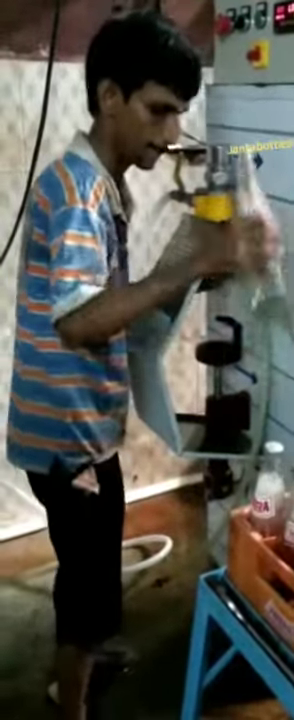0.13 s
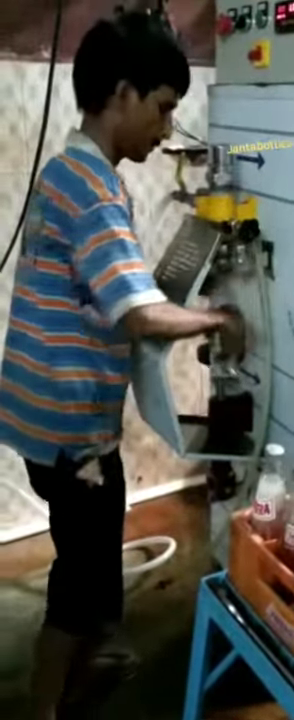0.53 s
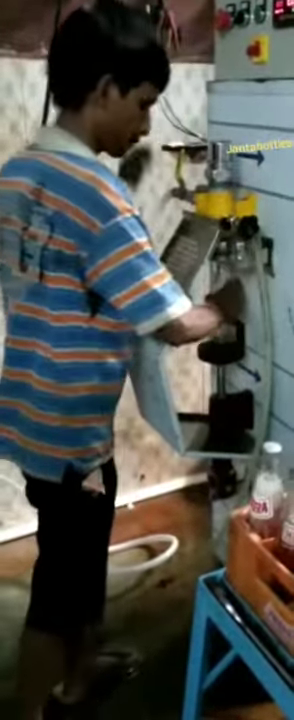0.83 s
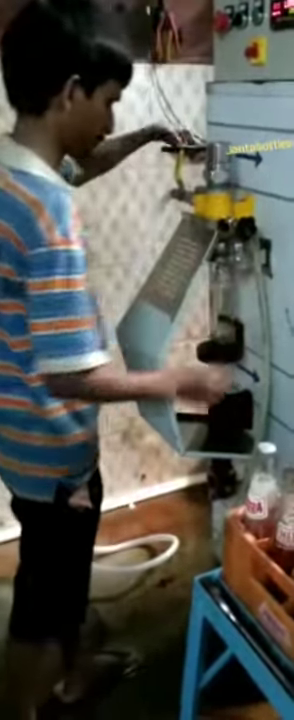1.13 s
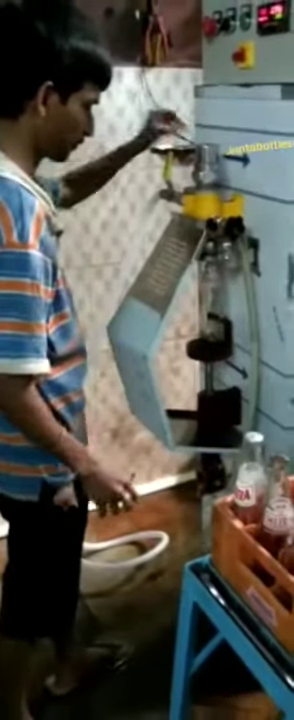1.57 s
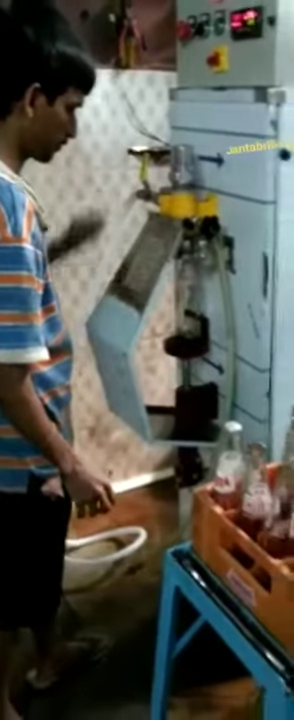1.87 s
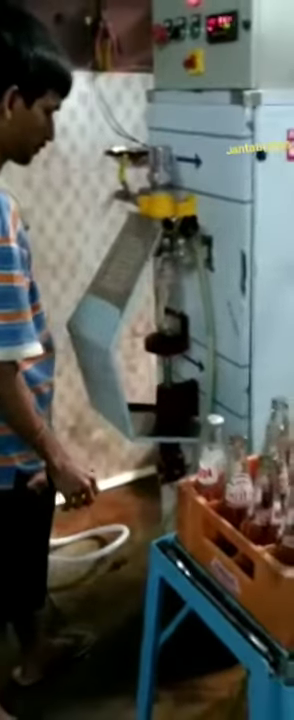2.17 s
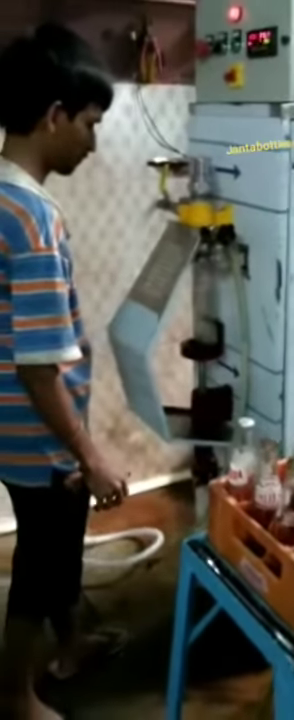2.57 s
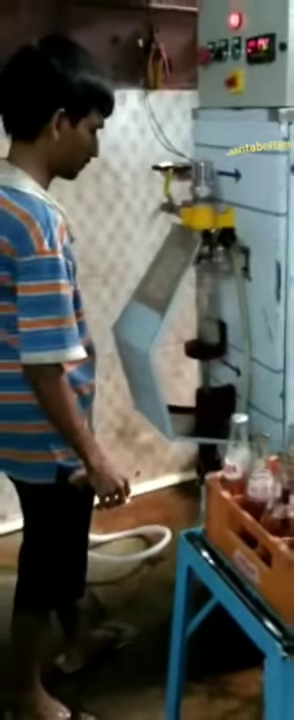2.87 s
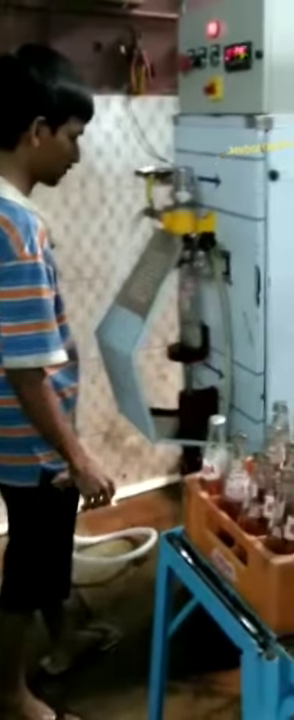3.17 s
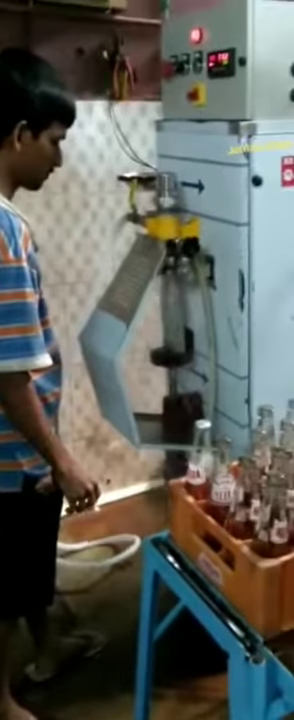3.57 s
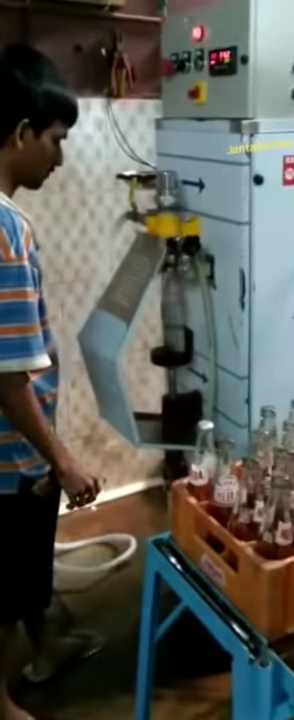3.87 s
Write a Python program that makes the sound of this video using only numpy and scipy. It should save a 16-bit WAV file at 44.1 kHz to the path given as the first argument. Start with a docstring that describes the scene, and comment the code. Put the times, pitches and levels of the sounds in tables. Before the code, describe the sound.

Bottle filling machine rushes unevenly with gas hisses, metal knocks and one glass bottle clink

```python
"""A small bottle filling machine rushes unevenly in a hard-walled workshop, its air line leaking faintly.
First come hisses of gas from its valves, puffs of air on the microphone and a knock (filtered noise, short tones).
Next a glass bottle clinks (ringing modes) and scrapes (rough noise) into its holder. Later come more knocks,
hisses, short metal pings (fading sines) and crowded puffs. The two microphone ports answer in opposite polarity."""
import sys
import numpy as np
from scipy import signal
from scipy.fft import rfft, irfft, next_fast_len
from scipy.io import wavfile
from scipy.ndimage import map_coordinates

SR = 44100
rng = np.random.default_rng(int(sys.argv[2]) if len(sys.argv) > 2 else 0)


def bounce(signal):
    """Save signal as a 16-bit WAV file at the path given by the first command-line argument."""
    frames = np.transpose(np.atleast_2d(signal))
    limited = np.clip(frames, -1, 1)
    pcm = np.round(limited * 32767).astype(np.int16)
    wavfile.write(sys.argv[1], SR, pcm)


N = 176400  # samples, 4 s


def amp(db):
    """Decibels to gain."""
    return 10 ** (np.asarray(db) / 20)


def unit(x):
    """The sound scaled to rms 1."""
    return x / np.sqrt(np.mean(x ** 2) + 1e-20)


def along(points, hz):
    """Read a table of (f/Hz, value) at any frequency, on a log axis."""
    f, value = np.transpose(points)
    return np.interp(np.log(hz + 1), np.log(f + 1), value)


def since(s):
    """Seconds passed since time s, zero before it."""
    return np.maximum(np.arange(N) / SR - s, 0)


def curve(rows):
    """Join (t/s, value) points by straight lines, one value per sample."""
    return np.interp(since(0), *np.transpose(rows))


def wobble(rate):
    """A smooth random curve with a given number of random points a second."""
    points = rng.standard_normal(int(N * rate / SR) + 4)
    return map_coordinates(points, [np.arange(N) * rate / SR], order=2)


def filtered(x, response):
    """Change each frequency of x by the gain and phase that response gives for it."""
    size = next_fast_len(N + 8192)
    hz = np.fft.rfftfreq(size, 1 / SR)
    return irfft(rfft(x, size) * response(hz), size)[..., :N]


def noise(spectrum):
    """Two unrelated noises of rms 1, coloured by a table of (f/Hz, level/dB)."""
    return unit(filtered(rng.standard_normal((2, N)), lambda hz: amp(along(spectrum, hz))))


def swell(start, rise, hold, release_db_per_s):
    """A loudness shape: straight rise, hold, then an even fall in dB."""
    fall = amp(-release_db_per_s * since(start + rise + hold))
    return np.minimum(since(start) / rise, 1) * fall


# how alike left and right are: (f/Hz, likeness 0 to 1)
LEFT_RIGHT_LIKENESS = [(100, 1), (250, 0.52), (500, 0.67), (750, 0.9), (1050, 1), (1500, 0.75), (1800, .8),
                       (2900, 0.84), (3400, 1), (3600, 1), (3850, 1), (4600, 0.8), (5400, 0.83),
                       (6200, 0.53), (7150, 0.91), (8200, .65), (9000, 0.033), (15000, 0.035)]


def spread(pair):
    """Mix two unrelated signals into left and right, as alike at each frequency as the table says."""
    def mix(hz):
        angle = np.arccos(np.clip(along(LEFT_RIGHT_LIKENESS, hz), 0, 1)) / 2
        return np.array([np.cos(angle), np.sin(angle)])
    common, apart = filtered(pair, mix)
    return np.array([common + apart, common - apart])


# time the room takes to fade by 60 dB: (f/Hz, t60/s)
ROOM_FADE = [(150, 0.28), (500, 0.43), (1500, 0.9), (4000, 0.97), (8000, 0.7), (14000, 0.39)]


def workshop(x, room_db):
    """Add the room's tail, fading noise that lasts longest between about 1.5 and 4 kHz."""
    hz, t, grains = signal.stft(rng.standard_normal((2, SR)), SR, nperseg=256)
    fading = grains * amp(-60 * t / along(ROOM_FADE, hz)[:, None])
    tail = signal.istft(fading, SR, nperseg=256)[1]
    tail = tail / np.linalg.norm(tail[0])
    wet = signal.fftconvolve(np.atleast_2d(x), tail, axes=1)[:, :N]
    direct = spread(x) if x.ndim == 2 else x
    return (direct + amp(room_db) * spread(wet)) / np.hypot(1, amp(room_db))


# ringing modes of the bottle: (f/Hz, relative level struck at foot/dB, same struck at neck/dB, t60/s)
GLASS_MODES = [(4574, 0, 0.5, 0.39), (4660, -10, 0, 0.33), (4764, 6, -7, 0.75), (5110, -28, -10, .45),
               (5160, -26, 1, 0.25), (5050, -17, -0.5, 0.27), (4990, -20, 0.5, 0.26), (5630, -26, -7, 0.12),
               (8070, -31, -7, 0.28), (7910, -19, -1.5, 0.31), (8480, -7, -13, 0.13), (8800, -7, -22, 0.14),
               (10420, -30, -7.5, 0.35), (10900, -12, -7, .2), (13700, -32, -18, .14)]
# glass contacts: (t/s, relative level/dB, place: 0 foot to 1 neck)
GLASS_CONTACTS = [(.622, -33, 0), (.642, -35.5, 0), (.675, -34, 0.48), (.692, -30, 0.036), (.713, -32, 0),
                  (.807, -22, 1), (.812, -29.5, 0.9), (.827, -38, 0.19)]
CLINK_SCATTER_DB = 3  # random spread of each mode's level
GLASS_ATTACK_S, GLASS_ROOM_DB = 0.00078, -1
BLUR_DB, BLUR_T60_S, BLUR_RATE_PER_S = 3, 0.22, 420  # level is relative to the clean tone
FOOT_BLUR_DB = -6  # blur at the foot relative to the neck: the foot rings cleaner


def bottle():
    """Each contact rings the glass, blurred at first; the place struck sets how loud each mode is."""
    ring = np.zeros(N)
    t = np.arange(SR // 2) / SR
    onset = 1 - np.exp(-t / GLASS_ATTACK_S)
    knots = np.arange(1024)
    for s, db, place in GLASS_CONTACTS:
        blur_db = BLUR_DB + (0.5 - place) * FOOT_BLUR_DB
        for hz, foot_db, neck_db, t60 in GLASS_MODES:
            mode_db = (1 - place) * foot_db + place * neck_db
            level_db = db + mode_db + CLINK_SCATTER_DB * rng.standard_normal()
            # a random drift in strength and phase smears the tone into close neighbours
            drift = [1, 1j] @ rng.standard_normal((2, len(knots)))
            blur = np.interp(t * BLUR_RATE_PER_S, knots, drift)
            clean = np.exp(2j * np.pi * rng.random())
            voice = amp(-60 * t / t60) * clean / 2
            voice = voice + amp(blur_db - 60 * t / BLUR_T60_S) * blur / 2
            tone = (voice * np.exp(2j * np.pi * hz * t)).imag
            ring[round(s * SR):][:len(t)] += amp(level_db) * onset * tone
    return workshop(ring, GLASS_ROOM_DB)


# colour of the scrape: (f/Hz, level/dB)
SCRAPE_COLOUR = [(200, -18), (500, 1), (800, 5.5), (1300, -5.5), (1900, 0.5), (2600, -0.5), (4000, -5),
                 (6500, -21), (9500, -35), (15000, -26)]
SLIDE_S, SLIDE_RISE_S, SLIDE_HOLD_S = 0.658, 0.03, 0.096
SLIDE_DB, SLIDE_RELEASE_DB_PER_S = -34, 217
KNOCK_ROOM_DB = -5  # room level, shared with the clanks and rattles


def slide(rough_db=5, slip_rate=130):
    """The bottle's foot scrapes into the holder in small slips, heard as noise of uneven level."""
    stroke = swell(SLIDE_S, SLIDE_RISE_S, SLIDE_HOLD_S, SLIDE_RELEASE_DB_PER_S)
    scrape = unit(noise(SCRAPE_COLOUR) * amp(rough_db * wobble(slip_rate)))
    return workshop(amp(SLIDE_DB) * stroke * scrape, KNOCK_ROOM_DB)


# knocks of holder, lever and valves: (t/s, thud level/dB, clank level/dB, rattle level/dB)
KNOCK_TIMES = [(.311, -45, -24, -32.5), (0.337, -45, -57, -24), (0.62, -45, -26.5, -23),
               (.684, -48, -34, -32), (0.809, -44, -51, -28), (1.314, -30, -40, -40),
               (1.328, -40, -26.5, -48), (1.439, -27, -29.5, -38), (2.119, -34, -24, -49),
               (2.126, -5, -20.5, -32), (2.763, -16, -45, -40), (3.097, -38, -29, -33),
               (3.161, -69, -34, -38), (3.336, -9, -22.5, -28), (3.362, -17, -45, -28)]
# colour of the sheet metal: (f/Hz, level/dB)
CLANK_COLOUR = [(150, -35), (420, -5), (530, -6), (700, 1.5), (860, 1.5), (1030, -3.5), (1220, -3),
                (1600, -3.5), (3000, -24.5), (8000, -57)]
# colour of the small parts: (f/Hz, level/dB)
RATTLE_COLOUR = [(600, -40), (1700, 1), (2000, 0), (2450, 5), (3000, -5.5), (3800, 5.5), (5300, -2),
                 (8000, -5), (10000, -10), (15000, -29)]
THUD_HZ, THUD_T60_S, THUD_ATTACK_S, THUD_ROOM_DB = 294, 0.038, 0.00078, -23
CLANK_T60_S, RATTLE_T60_S, CLANK_ATTACK_S = 0.14, 0.14, 0.0032


def knocks():
    """Each blow gives a cabinet thud, a sheet-metal clank that builds up, and a rattle of small parts."""
    thud, clank, rattle = np.zeros((3, N))
    for s, thud_db, clank_db, rattle_db in KNOCK_TIMES:
        t = since(s)
        onset = 1 - np.exp(-t / THUD_ATTACK_S)
        build_up = 1 - np.exp(-t / CLANK_ATTACK_S)
        thud += onset * amp(thud_db - 60 * t / THUD_T60_S) * np.sin(2 * np.pi * THUD_HZ * t)
        clank += build_up * amp(clank_db - 60 * t / CLANK_T60_S)
        rattle += onset * amp(rattle_db - 60 * t / RATTLE_T60_S)
    metal = clank * noise(CLANK_COLOUR) + rattle * noise(RATTLE_COLOUR)
    return workshop(thud, THUD_ROOM_DB) + workshop(metal, KNOCK_ROOM_DB)


# metal parts that ring briefly: (t/s, f/Hz, level/dB, t60/s)
METAL_PINGS = [(.336, 2490, -34, .45), (.336, 2950, -39, .35), (2.126, 1220, -27, .12),
               (3.098, 3860, -28, 0.16), (3.098, 5240, -41, .12), (3.098, 2510, -41, .12),
               (3.224, 3880, -28, 0.13), (3.25, 854, -21.5, 0.091), (3.34, 860, -21.5, 0.087)]
PING_ATTACK_S, PING_ROOM_DB = 0.0029, -6


def pings(chatter_db=3, chatter_rate=150):
    """Loose springs and valve parts ring as fading sines whose level chatters at random."""
    ring = np.zeros(N)
    for s, hz, db, t60 in METAL_PINGS:
        t = since(s)
        onset = 1 - np.exp(-t / PING_ATTACK_S)
        ring += amp(db - 60 * t / t60) * onset * np.sin(2 * np.pi * hz * t)
    return workshop(ring * amp(chatter_db * wobble(chatter_rate)), PING_ROOM_DB)


# gas vents: (t/s, rise/s, hold/s, level/dB, release/dB per s, tilt above 1 kHz/dB per octave,
#             level of the sharp edge relative to the jet/dB)
GAS_VENTS = [(0.078, 0.067, 0.091, -40.5, 120, 5, -7), (0.299, 0.012, 0.012, -29.5, 204, 1, -13),
             (1.024, 0.071, 0.027, -42.5, 107, 0.5, -0.5), (1.305, 0.12, 0.072, -31.5, 60, -4, -8.5),
             (2.094, 0.094, 0.12, -26, 65.5, 0.4, -27), (2.099, .015, .03, -38.5, 200, -2, -2),
             (3.033, 0.018, 0.033, -37, 98, -5, -20), (3.29, 0.037, 0.037, -27, 170, 0.3, -23),
             (3.365, 0.023, 0.021, -21.5, 150, 2.5, -0.5), (3.548, 0.058, .04, -39.5, 128, -0.5, -9)]
# colour of the gas jet: (f/Hz, level/dB)
GAS_COLOUR = [(150, -60), (500, -18), (1000, -7), (1800, -5.5), (2700, -1.5), (4200, -1), (6300, -4),
              (8000, -3), (9800, -11.5), (15000, -15.5)]
# colour of the sharp edge, mostly 4-8 kHz: (f/Hz, level/dB)
EDGE_COLOUR = [(2500, -41), (3700, -12), (4200, 3), (5200, -1.5), (6250, 6), (7100, -0.5), (7900, 1.5),
               (9500, -42), (15000, -51)]
GAS_ROOM_DB = -4.5


def vents(flutter_db=1.5, flutter_rate=120):
    """Each valve lets off a jet of noise that rises, holds and dies away, sputtering a little."""
    gas, edge = noise(GAS_COLOUR), noise(EDGE_COLOUR)
    jets = 0
    for s, rise, hold, db, release, tilt_db, edge_db in GAS_VENTS:
        jet = unit(filtered(gas, lambda hz: amp(tilt_db * np.log2(np.maximum(hz, 1000) / 1000))))
        jets = jets + amp(db) * swell(s, rise, hold, release) * (jet + amp(edge_db) * edge)
    return workshop(jets * amp(flutter_db * wobble(flutter_rate)), GAS_ROOM_DB)


# loudness of the running machine: (t/s, level/dB)
MACHINE_LEVEL = [(0, -38.5), (.28, -37.5), (.5, -44), (.8, -37), (.95, -44.5), (1.3, -42.5), (1.45, -34),
                 (1.8, -40), (2.1, -33), (2.4, -34.5), (2.6, -39), (2.9, -34), (3.15, -30), (3.35, -36),
                 (3.5, -42), (3.8, -49.5), (4, -54.5)]
# colour of the running machine: (f/Hz, level/dB)
MACHINE_COLOUR = [(40, -22), (120, -3.5), (250, 2.5), (400, 2), (600, -5.5), (900, -3.5), (1400, -10),
                  (1900, -10), (2700, -11), (4000, -16.5), (7500, -21), (9800, -32), (15000, -24)]
# colour of a faint constant air leak: (f/Hz, level/dB)
LEAK_COLOUR = [(1500, -25), (3000, -1), (7000, 7), (9500, -5), (15000, -17)]
LEAK_DB = -51.5


def machine(waver_db=1.5, waver_rate=25):
    """The running machine is noise of uneven level; its leaking air line is a faint constant hiss."""
    level_db = curve(MACHINE_LEVEL) + waver_db * wobble(waver_rate)
    rush = noise(MACHINE_COLOUR) * amp(level_db)
    return spread(rush + amp(LEAK_DB) * noise(LEAK_COLOUR))


# air puffs on the microphone: (t/s, level/dB, f/Hz)
AIR_PUFFS = [(.168, -19.5, 152), (0.3, -22, 139), (0.594, -23.5, 150), (1.138, -29, 167),
             (1.443, -13.5, 153), (1.466, -22.5, 179), (1.635, -22, 126), (1.704, -23.5, 107),
             (1.924, -17.5, 127), (2.034, -17, 182), (2.085, -14.5, 134), (2.285, -17.5, 190),
             (2.758, -18, 131), (2.775, -14.5, 169), (2.833, -19.5, 167), (2.961, -16.5, 146),
             (2.984, -11, 145.4), (3.009, -14.5, 142), (3.095, -18.5, 142), (3.155, -17, 169),
             (3.17, -15.5, 217), (3.195, -17, 125), (3.221, -19, 176), (3.25, -10.5, 139)]
# level of the draught as heard beneath the puffs, written to dip around some loud treble sounds: (t/s, level/dB)
DRAUGHT_LEVEL = [(0, -37), (.29, -35), (.36, -53), (.6, -36.5), (.77, -38), (.84, -44), (1.08, -45),
                 (1.15, -39.5), (1.3, -42), (1.45, -28.5), (1.8, -34), (2.05, -28), (2.48, -31.5),
                 (2.61, -40.5), (2.75, -34), (3.3, -25.5), (3.42, -47.5), (4, -46.5)]
# colour of the draught: (f/Hz, level/dB)
BUFFET_COLOUR = [(20, -28), (45, -15), (80, -6), (130, 0), (190, -1.5), (300, -14), (450, -18),
                 (800, -41.5), (2000, -70)]
# colour of the turbulence inside a puff: (f/Hz, level/dB)
TURBULENCE_COLOUR = [(25, -24), (70, -8), (150, -2), (280, -3), (420, -4.5), (650, -19.5), (1500, -50)]
TURBULENCE_DB = -10.5  # relative to the puff
PUFF_CYCLES = 0.43  # half-length of a puff, in cycles of its pitch


def draught(lumpy_db=3.5, lump_rate=70, apart_db=-14):
    """Air buffets the microphone as lumpy low noise, with short puffs of low tone and turbulence on top."""
    common, apart = noise(BUFFET_COLOUR)
    side = amp(apart_db) * apart
    buffet = np.array([common + side, common - side])
    air = unit(buffet * amp(lumpy_db * wobble(lump_rate))) * amp(curve(DRAUGHT_LEVEL))
    turbulence = amp(TURBULENCE_DB) * spread(noise(TURBULENCE_COLOUR))
    for s, db, hz in AIR_PUFFS:
        cycles = np.clip((since(0) - s) * hz, -10, 10)
        thump = np.sqrt(2) * np.sin(2 * np.pi * cycles)
        air = air + amp(db) * (thump + turbulence) / np.cosh(cycles / PUFF_CYCLES)
    return air


def scene():
    """Glass, knocks, gas and machine sound in the room; the draught is right at the microphone."""
    return bottle() + slide() + knocks() + pings() + vents() + machine() + draught()


# extra phase lead of the left port: (f/Hz, phase/rad)
LEFT_PORT_PHASE = [(100, -0.039), (200, -0.089), (300, -0.48), (600, -0.43), (900, -0.39), (1250, 0.22),
                   (1800, -0.11)]
PORT_LAG_S = .000557
TOP_HZ = 15650  # band limit


def record(dry):
    """The left port lags, the right is inverted, and nothing passes above the band limit."""
    def ports(hz):
        left = np.exp(1j * (along(LEFT_PORT_PHASE, hz) - 2 * np.pi * hz * PORT_LAG_S))
        right = -np.ones_like(hz)
        return np.array([left, right]) * (hz < TOP_HZ)
    return filtered(dry, ports)


dry = scene()
out = record(dry)
bounce(out)
```